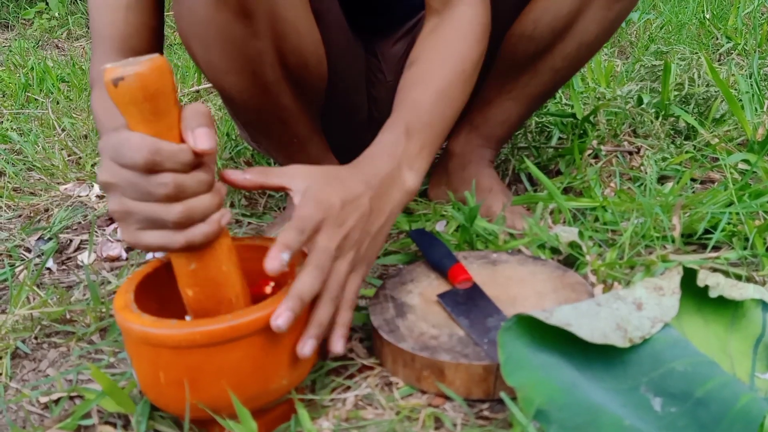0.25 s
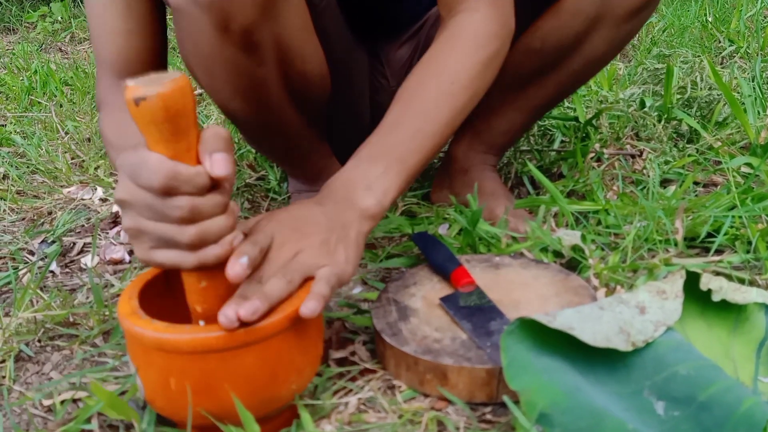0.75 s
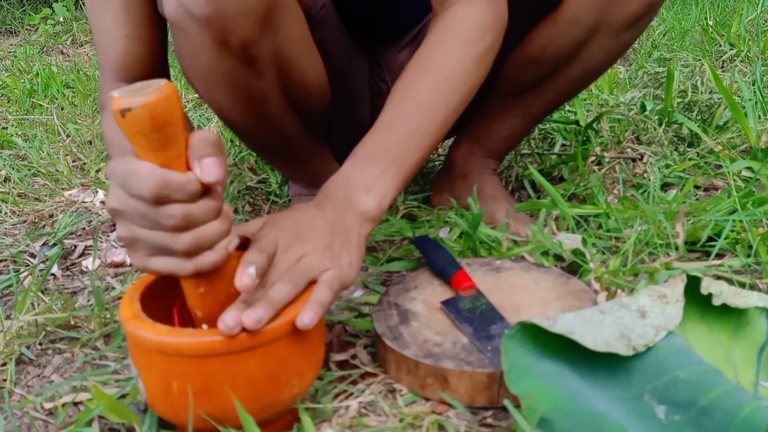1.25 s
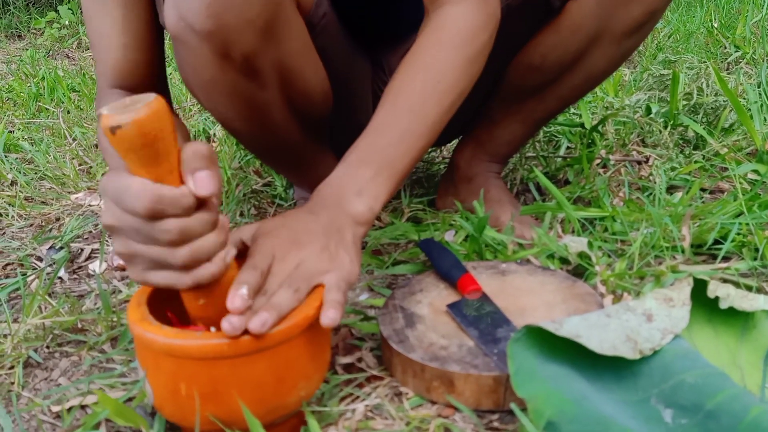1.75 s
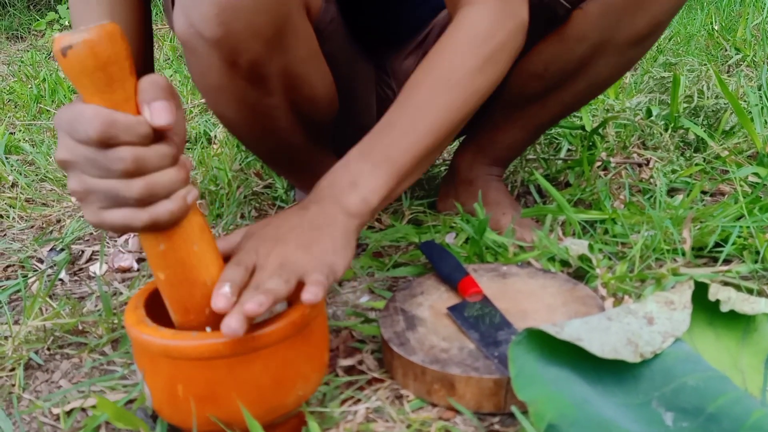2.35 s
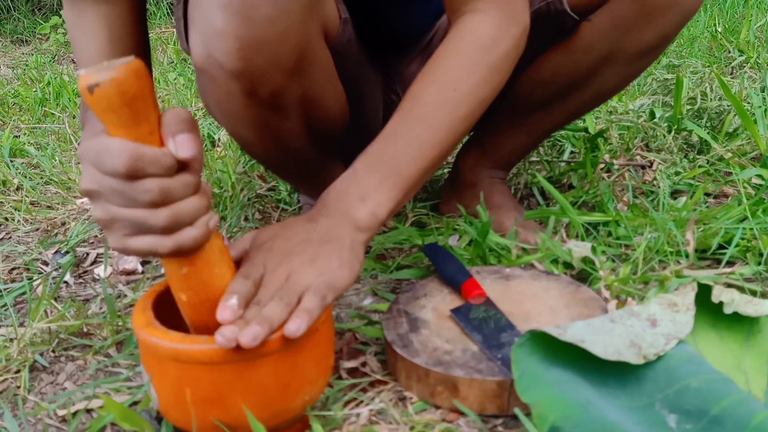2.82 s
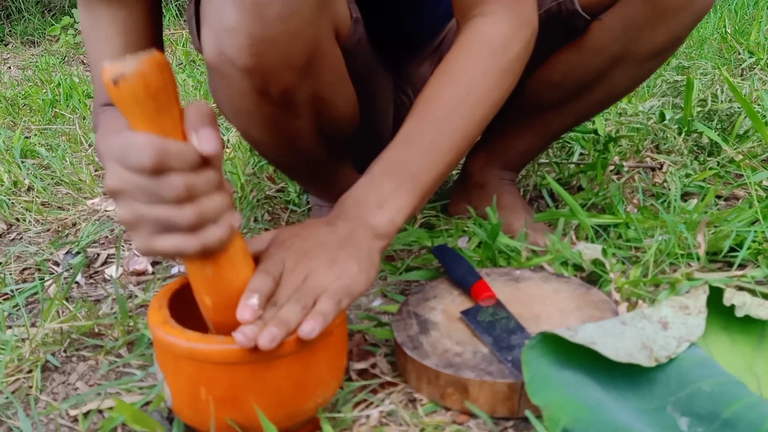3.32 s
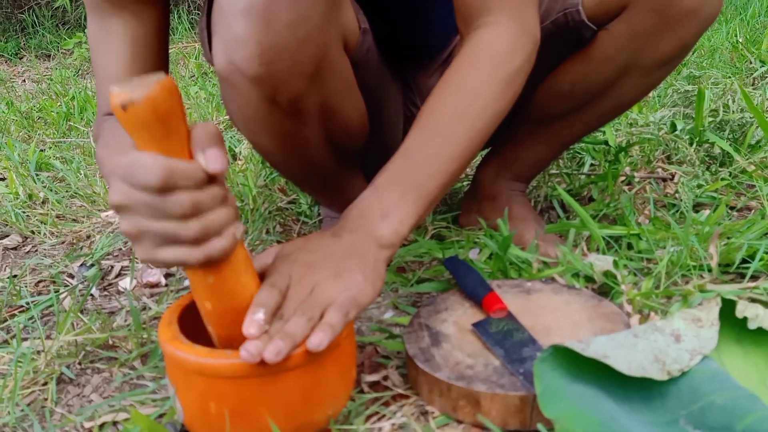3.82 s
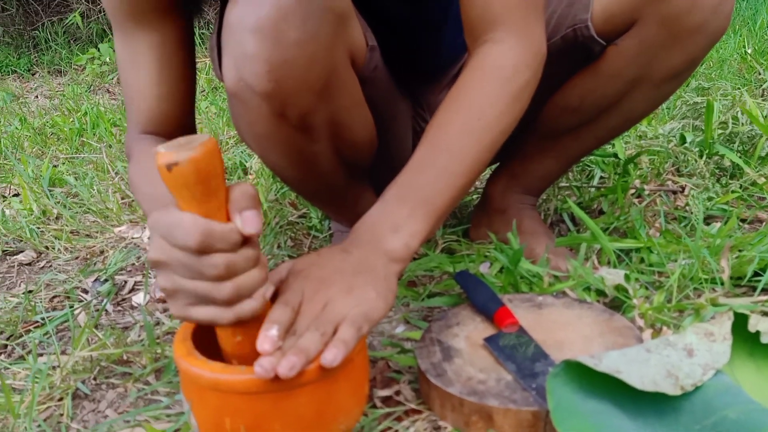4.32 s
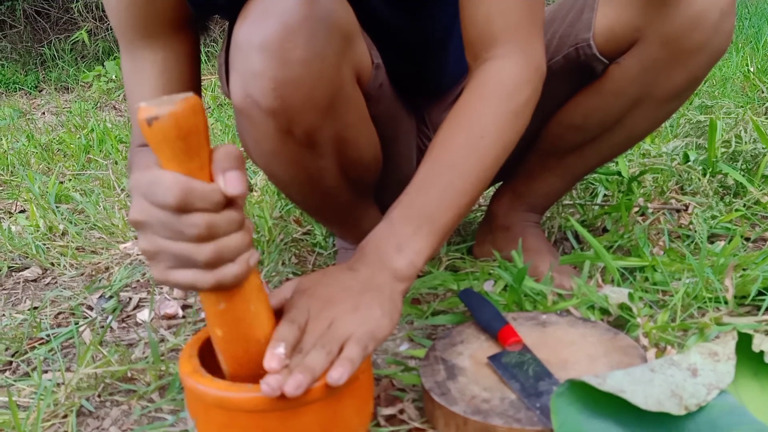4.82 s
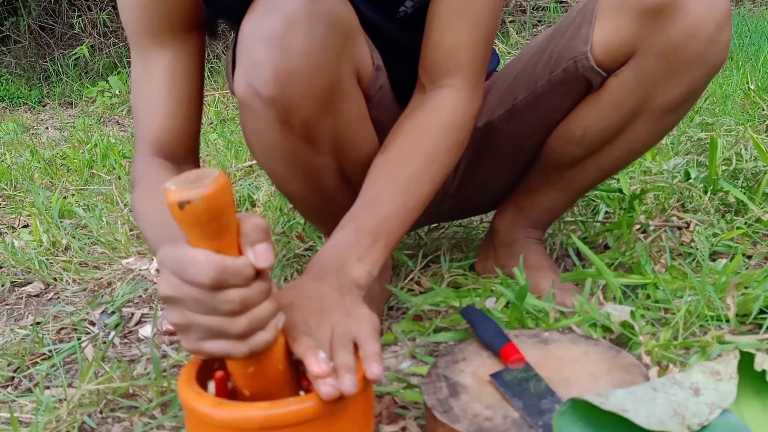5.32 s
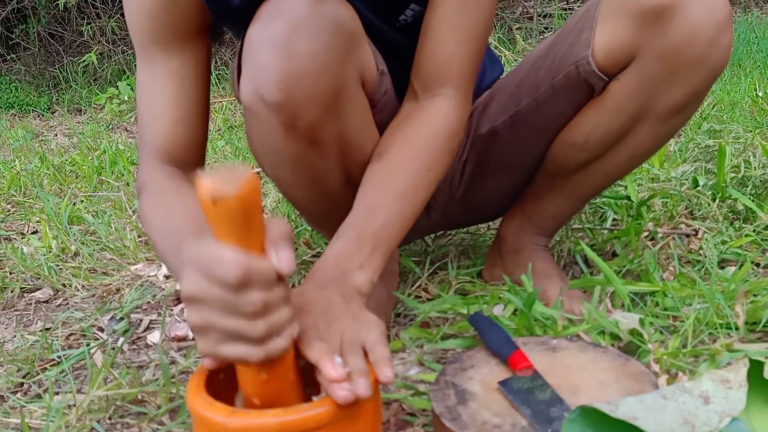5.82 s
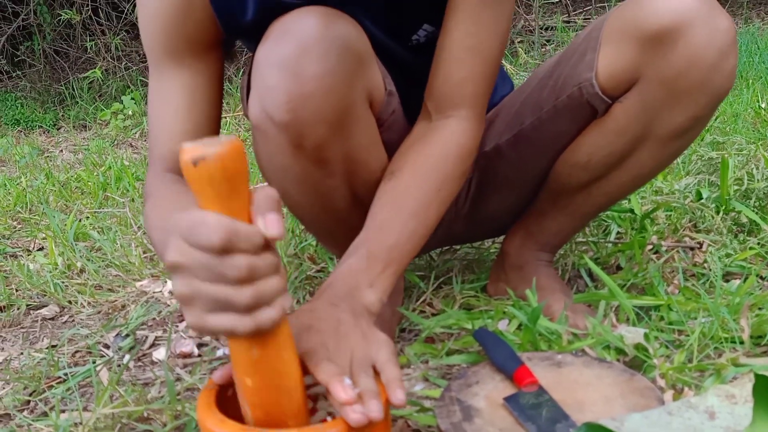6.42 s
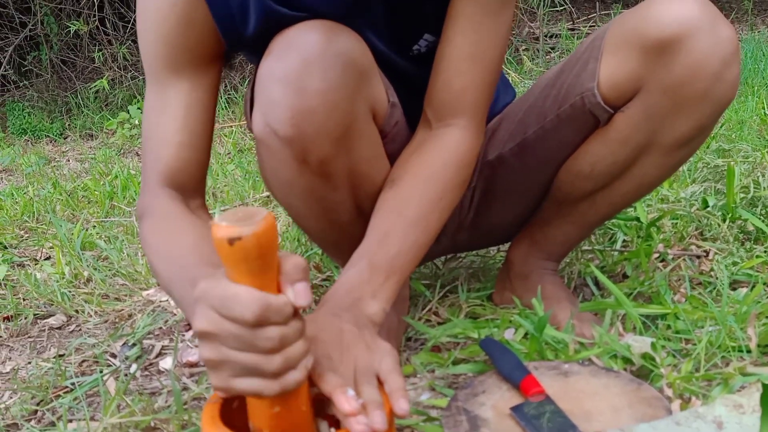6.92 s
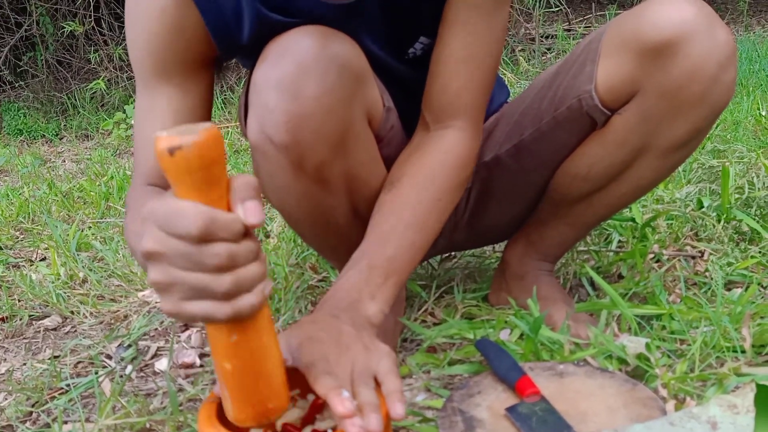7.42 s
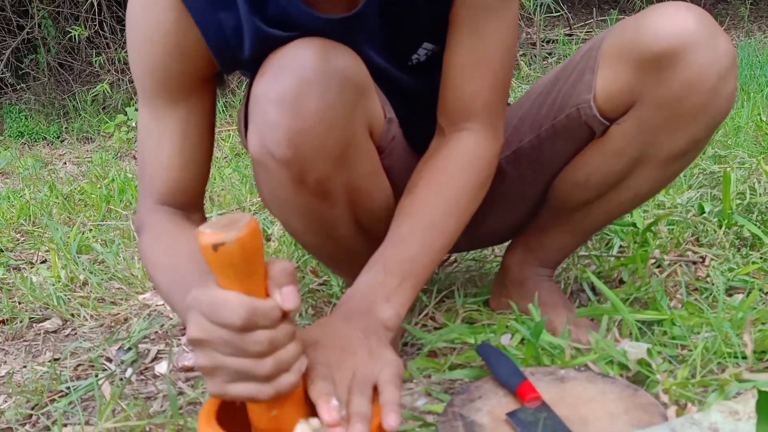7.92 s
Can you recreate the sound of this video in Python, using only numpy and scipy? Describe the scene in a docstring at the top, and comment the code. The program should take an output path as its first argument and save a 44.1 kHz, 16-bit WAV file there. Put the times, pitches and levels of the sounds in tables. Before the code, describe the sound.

A wooden pestle pounds chillies in a clay mortar on grass, heard close in stereo. A faint crunch at 0.2 s is followed by a firmer one at 0.7, then blows from 1.15 s quicken to four or five a second. Each is a brief gritty crunch with a dry, quickly damped hollow clay ring; crisp pod snaps spit out, clearest around 1.7 to 2.6 s. A very hard double-edged clack hits at 1.9 s, lighter knocks at 2.7 and 3.1, and another hard clack at 3.3. The microphone ducks after the hard hits and recovers. From 3.6 s the blows become even, about three a second, with soft ground thuds stronger near 7 s. Quiet outdoor wash continues throughout, with low wind flutter and small buffets, mostly left, strongest near 8 s. Two very faint far whistles, possibly a bird, come at 7.5 and 8 s.

```python
"""Chillies pounded in a clay mortar

A wooden pestle pounds chillies in a clay mortar on grass, close to a two-port microphone.
Blows crunch as bursts of noise, pods snap as tiny noisy spits, and dying sines ring clay and bowl air.
Far outdoor wash and wind are shaped noise; two faint far whistles are sines.
Gain control turns everything down after hard knocks, then lets the level recover."""
import sys
import numpy as np
from scipy import signal
from scipy.fft import rfft, irfft, next_fast_len
from scipy.io import wavfile
from scipy.ndimage import uniform_filter1d

SR = 44100
rng = np.random.default_rng(int(sys.argv[2]) if len(sys.argv) > 2 else 0)


def persist_wave(psi):
    """Save psi, clipped to +-1, as 16-bit WAV."""
    counts = np.round(np.clip(psi, -1, 1) * 32767).astype(np.int16)
    wavfile.write(sys.argv[1], SR, np.atleast_2d(counts).T)


N = 359415  # length in samples

# Pods crushed by each blow: peak_s, crunch_db, crispness_db, bowl_air_db, bowl_air_hz,
# wall_ring_db, favoured_wall_hz, ground_thud_db, fall_s
CRUSHING_BLOWS = [(0.1724, -42, -2, -57, 920, -58, 1720, -66, 0.014),
                  (0.727, -33, -5, -37.5, 840, -45, 1720, -54, 0.0039),
                  (1.154, -36, -2.5, -37, 870, -47, 1135, -45, 0.012),
                  (1.4609, -32, 1, -39, 837, -40, 1720, -59, 0.0044),
                  (1.6911, -36.5, 8.5, -41.5, 750, -49, 2500, -60, 0.0046),
                  (1.9047, -35.5, 2.5, -59, 640, -37, 2460, -30, 0.012),
                  (2.1148, -34.5, 3.5, -47, 670, -57, 1670, -62, 0.0057),
                  (2.4107, -36, 1, -52, 900, -35, 1860, -58, 0.012),
                  (2.628, -38.5, 2, -46.5, 610, -40, 1670, -53, 0.012),
                  (2.8526, -34.5, -1, -49, 716, -42, 1670, -69, 0.0041),
                  (3.0805, -33.5, 8, -40, 802, -38, 1760, -40, 0.0056),
                  (3.6387, -38.5, -20, -41, 730, -52, 1680, -61, 0.0045),
                  (3.919, -35, -14, -38.5, 716, -56, 1680, -58, 0.0048),
                  (4.2246, -41, -6, -46.5, 755, -43, 1780, -58, 0.0092),
                  (4.5383, -39, 3, -43.5, 697, -36, 1144, -38.5, 0.0029),
                  (4.8542, -36, -16, -49, 740, -38, 1560, -48, 0.0056),
                  (5.1687, -46.5, 9, -47.5, 673, -39.5, 1670, -52, 0.014),
                  (5.4696, -32.5, -10, -43, 610, -50, 1680, -44, 0.003),
                  (5.7722, -35.5, 3.5, -48, 754, -48, 1610, -44, 0.0061),
                  (6.0896, -37.5, 2, -54, 633, -42, 1680, -47, 0.0045),
                  (6.4218, -35.5, 4.5, -44, 695, -45, 1630, -38, 0.0067),
                  (6.7501, -30.5, 4.5, -39.5, 720, -43, 1670, -34.5, 0.0021),
                  (7.0903, -35, 3, -37.5, 642, -40.5, 1640, -25, 0.004),
                  (7.4489, -32.5, 3.5, -43.5, 736, -45, 1700, -36, 0.011),
                  (7.7995, -34, 3, -50.5, 750, -32.5, 1560, -57, 0.0091),
                  (8.109, -34.5, 2, -40, 720, -46, 1760, -30, 0.0064)]
# Wood hitting clay: start_s, push_db, bowl_air_hz, wall_ring_db, favoured_wall_hz, favoured_wall_db,
# crack_db, contact_s, second_contact_after_s, second_push_db
CLAY_KNOCKS = [(1.9117, -4.5, 752, -15, 1700, 5.5, -37, 0.00013, 0.0019, 3),
               (2.6606, -16, 728, -48, 1630, 8, -51, 0.00035, 0.00192, -11),
               (3.1105, -17.5, 730, -49, 1600, 4, -61, 0.00038, 0.002, -15.5),
               (3.3343, -8.5, 724, -6, 1562, -24, -27.5, 0.00015, .0052, 5.5),
               (4.492, -33.5, 607, -56, 1160, 3, -61, 0.00063, 0.00226, -42),
               (4.5215, -32, 610, -53, 1160, 1, -60, 0.00065, 0.0024, -27.5)]
# Single pods snapping: start_s, peak_db, pitch_hz, left_minus_right_db, length_s
POD_SNAPS = [(0.172, -29, 5750, -7, 0.0011), (0.1987, -29, 4800, 11, 0.0018),
             (1.6933, -19, 5100, 2, 0.0028), (2.1136, -19.5, 5640, -3.0, 0.0078),
             (2.4095, -14.5, 4000, 0.5, 0.0031), (2.412, -28, 4900, -19, 0.002),
             (2.625, -23.5, 4040, 3, 0.0037), (3.0845, -27, 6100, -13, 0.0014),
             (3.921, -24, 4940, 1, 0.0014), (6.089, -32, 4170, 6, 0.003),
             (7.4474, -28.5, 3580, -17, 0.0018), (7.45, -31.5, 2160, -15, 0.0052),
             (7.4584, -30, 1630, 17, 0.00085)]
# The pestle grazing the wall: start_s, level_db, favoured_wall_hz
WALL_GRAZES = [(1.1925, -45, 1160), (1.7725, -48, 1170), (1.799, -49, 1170), (5.0172, -44, 2420),
               (6.4988, -50, 1160)]
# Ringing tones of the clay wall: pitch_hz, level_db, time_to_fall_60_db_s
WALL_MODES = [(1180, -7, 0.056), (1622, 3.5, 0.056), (1871, -10.5, 0.034), (2233, -8.5, 0.032),
              (2702, -17, 0.017), (3180, -7.5, 0.019), (3640, -29.5, .012), (4600, -28, .012),
              (5600, -26.5, 0.036)]
# The bowl rocking on the ground: pitch_hz, level_db, time_to_fall_60_db_s
ROCKING_MODE = (676, -2.6, 0.0079)
# Tone colour of crushed pods: frequency_hz, level_db (per Hz)
CRUSH_COLOUR = [(880, -5.5), (1500, -6), (1690, 5.5), (1920, -5.5), (3000, -3.5), (3380, -6.5),
                (3810, -0.5), (4200, -9), (5830, 2.5), (8080, -19.5), (11900, -22), (13800, -18.5),
                (16000, -30.5)]
# How far the left port leads for the mortar: frequency_hz, left_lead_radians
PORT_LEAD = [(100, 0), (450, -.5), (800, -.35), (1163, -.8), (1560, -2.6), (1800, -3.4), (2400, -6.5),
             (3800, -9.8), (5800, -16.8), (16000, -43)]
# How alike the crunch is at both ports: frequency_hz, likeness (0 to 1)
CRUNCH_LIKENESS = [(500, 0.65), (1500, 0.27), (4000, 0.54), (10000, 0.077)]
# Level difference of the mortar between the ports: frequency_hz, left_minus_right_db
PORT_SHADE = [(800, 0), (1160, 2), (1560, -2), (1950, -4), (2500, -2), (6000, -2), (14000, 3)]
# Faint far whistles, perhaps a bird: start_s, length_s, pitch_hz, level_db
FAR_WHISTLES = [(7.517, 0.038, 1280, -61), (7.984, 0.082, 1230, -61)]
# Tone colour of the outdoor wash: frequency_hz, level_db (per Hz)
WASH_COLOUR = [(24, -53), (40, -4.5), (124, -0.5), (329, -9), (422, -17), (615, -13), (1370, -20),
               (2150, -14.5), (3470, -22.5), (4300, -22.5), (5720, -14), (6820, -24.5), (9940, -32),
               (13800, -30), (14800, -31), (16000, -64)]
# How alike the wash is at both ports: frequency_hz, likeness (-1 to 1)
WASH_LIKENESS = [(60, 0.86), (130, 1), (290, 0.41), (640, 0.52), (1410, -0.2), (3100, 0.1), (6820, -0.047),
                 (15000, 0.061)]
# Level difference of the wash between the ports: frequency_hz, left_minus_right_db
WASH_LEAN = [(60, -0.5), (180, 0.5), (550, 0.5), (1650, 1.0), (4970, -1), (15000, 3.5)]
# Rising and falling breeze on the ports: time_s, level_db
BREEZE = [(0, -70), (1.101, -67.5), (2.2, -57), (3.3, -55), (4.05, -53.5), (4.45, -66), (4.8, -55),
          (5.3, -52), (5.65, -62), (6.3, -53.5), (7.0, -68.5), (7.649, -59), (8.15, -52)]
# Wind buffets: middle_s, level_db, half_length_s, left_minus_right_db
WIND_BUFFETS = [(1.474, -43, 0.018, 5), (4.2, -50.5, 0.046, 22.5), (4.9, -45, 0.017, 2),
                (5.23, -49, .05, -1), (5.76, -46.5, 0.026, 18), (6.143, -53.5, 0.026, 12),
                (6.346, -55, 0.036, 17), (7.777, -51, 0.017, 22), (7.83, -51.5, .03, 11),
                (7.905, -41, 0.03, 22), (8.078, -42, 0.057, 5)]
# Tone colour of the wind: frequency_hz, level_db (per Hz)
WIND_COLOUR = [(15, -57), (25, -21), (65, 12), (130, 8.5), (271, -8), (354, -14.5), (420, -31), (530, -25),
               (700, -33.5), (910, -73), (1540, -120)]

SCATTER_DB = 5.5  # each crunch falls a little left or right
# Rise of the crunch: harder blows and long-settling ones rise quicker
SINK_S, HARD_DB, QUICKER_PER_DB, USUAL_FALL_S, TRADE = 0.0062, -35.5, 0.09, 0.0042, 0.39
AIR_LEAD_S = 0.0032  # the bowl air is squeezed just before the crunch peaks
AIR_T60_S = 0.04  # time for the bowl air to fall 60 dB after a knock
WASH_DB = -51
# The left port is more exposed to wind; each port flutters by itself
WIND_LEAN_DB, FLUTTER_DB, FLUTTER_S = 5.5, 4.0, 0.06
EDGE_HZ = 15900  # top of the microphone's band


def gain_of(db):
    """Turns dB into a multiplier."""
    return 10 ** (np.asarray(db) / 20)


def evened(x):
    """Scales a sound to an average strength (rms) of 1."""
    return x / np.sqrt(np.mean(x ** 2) + 1e-20)


def levelled(x, db):
    """Sets the crest of a ringing sound so that its loudest cycles have rms db."""
    return gain_of(db) * np.sqrt(2) * x / abs(x).max()


def read(points, hz):
    """Reads a table between its points, on a log-frequency axis."""
    f, value = np.transpose(points)
    return np.interp(np.log(hz + 1), np.log(f + 1), value)


def add(mix, s, sound):
    """Mixes a sound in at s seconds."""
    part = mix[:, round(s * SR):][:, :sound.shape[-1]]
    part += sound[..., :part.shape[1]]


def panned(x, lr_db):
    """Splits a left-minus-right level difference between the ports."""
    return x * gain_of([[lr_db / 2], [-lr_db / 2]])


def shaped(x, gains):
    """Colours a sound by multiplying its spectrum by gains(Hz)."""
    size = next_fast_len(N)
    spectrum = rfft(x, size) * gains(np.fft.rfftfreq(size, 1 / SR))
    return irfft(spectrum, size)[..., :N]


def ring(modes, rise):
    """Adds dying sines, one per ringing tone, that build up over rise seconds."""
    t = np.arange(3000) / SR
    sines = sum(gain_of(db - 60 * t / t60) * np.sin(2 * np.pi * hz * t) for hz, db, t60 in modes)
    return sines * (1 - np.exp(-t / rise))


def mortar():
    """Passes all mortar sounds to the ports with their lag and shade; crunches differ between ports."""
    # crunch lanes: two for what the ports share, two for what differs
    crunch, bowl = np.zeros((4, N)), np.zeros((2, N))
    for row in CRUSHING_BLOWS:
        blow(crunch, bowl, *row)
    for row in CLAY_KNOCKS:
        knock(crunch, bowl, *row)
    for s, *row in WALL_GRAZES:
        add(bowl, s, graze(*row))
    for s, *row in POD_SNAPS:
        add(bowl, s, snap(*row))

    def alike(hz):
        return np.clip(read(CRUNCH_LIKENESS, hz), 0, 1)

    def colour(hz):
        db = read(CRUSH_COLOUR, hz)
        return gain_of(db) / np.sqrt(np.mean(gain_of(2 * db)))

    hiss = shaped(crunch[:2], lambda hz: colour(hz) * np.sqrt(alike(hz)))
    hiss += shaped(crunch[2:], lambda hz: colour(hz) * np.sqrt(1 - alike(hz)))
    half = np.array([[.5], [-.5]])  # each port takes half of every difference

    def to_ports(hz):
        return np.exp(1j * half * read(PORT_LEAD, hz)) * gain_of(half * read(PORT_SHADE, hz))

    return shaped(bowl + hiss, to_ports)


def blow(crunch, bowl, s, db, crisp_db, air_db, air_hz, wall_db, wall_hz, thud_db, fall):
    """The pestle sinks through the pods: a swell of tiny fractures hisses and shakes the bowl."""
    t = np.arange(-1200, 2400) / SR  # zero is the peak
    rise = SINK_S * np.exp(-QUICKER_PER_DB * (db - HARD_DB)) * (USUAL_FALL_S / fall) ** TRADE
    lr_db = SCATTER_DB * rng.standard_normal()
    swell = np.exp(-(abs(t) / np.where(t < 0, rise, fall)) ** 0.92)
    # a softer, longer swell: pods give early and settle late
    swell += gain_of(-26.0) * np.exp(-abs(t) / np.where(t < 0, .008, .02))
    clumps = gain_of(5.3 * evened(uniform_filter1d(rng.standard_normal(len(t)), size=30)))
    grit = evened(rng.standard_normal((len(t), 3)).T * clumps) * swell
    fine = signal.sosfilt(signal.butter(4, 7500., "high", fs=SR, output="sos"), grit)
    # dry skins add treble, wet pulp less
    hiss = (grit + (gain_of(crisp_db) - 1) * fine) * gain_of(db)
    add(crunch, s + t[0], np.vstack([panned(hiss[0], lr_db), panned(hiss[1:], lr_db)]))

    air = ring([(air_hz, 0, .034)], 0.0011)  # the pulp damps the air ring
    wall = ring([(wall_hz, 7., .035)] + WALL_MODES, 0.0018)  # the struck spot favours one tone
    ground_modes = [(450, 3.5, 0.033), (347, 7.5, 0.021), (258, 3, 0.039), (161.5, -12.5, 0.26)]
    ground = ring(ground_modes, 0.00041)
    squeeze = grit[0] * swell ** 0.49  # the air is pushed mostly at the deepest moment
    add(bowl, s + t[0] - AIR_LEAD_S, levelled(signal.fftconvolve(squeeze, air), air_db))
    add(bowl, s + t[0], levelled(signal.fftconvolve(grit[0], wall), wall_db))
    add(bowl, s - .0007, levelled(ground, thud_db))


def knock(crunch, bowl, s, db, air_hz, wall_db, wall_hz, favour_db, crack_db, contact, after, second_db):
    """A half-sine push and a second contact ring the bowl air; the resting pestle soon mutes the wall."""
    t = np.arange(600) / SR
    lag = s * SR % 1 / SR  # the part of the start time smaller than one sample

    def push(start, width):
        phase = np.clip((t - start) / width, 0, 1)
        return -np.sin(np.pi * phase) / (width * SR / 2)

    pushes = gain_of(db) * push(lag, contact) + gain_of(second_db) * push(lag + after, contact)
    air = signal.fftconvolve(pushes, ring([(air_hz, 0, AIR_T60_S), ROCKING_MODE], 0.0022))
    wall_push = gain_of(wall_db) * push(lag, 0.19 * contact)
    wall = signal.fftconvolve(wall_push, ring([(wall_hz, favour_db, .04)] + WALL_MODES, 0.0011))
    # muting starts after 6 ms at 910 dB a second and stops at 12 dB
    wall *= gain_of(-np.clip(910.0 * (np.arange(len(wall)) / SR - .006), 0, 12.))
    bass_cut = signal.butter(2, 380., "high", fs=SR, output="sos")  # a small bowl radiates little bass
    add(bowl, s, signal.sosfilt(bass_cut, air + wall))
    # grit under the wood
    crack = rng.standard_normal((len(t), 4)).T * np.exp(-t / 0.0051) * np.minimum(t / 0.00051, 1)
    treble_cut = signal.butter(4, 6500., fs=SR, output="sos")
    add(crunch, s, gain_of(crack_db) * signal.sosfilt(treble_cut, crack))


def graze(db, wall_hz):
    """A brief scuff of grit rings the wall faintly."""
    scuff = rng.standard_normal(400) * np.exp(-np.arange(400) / SR / 0.0022)
    wall = ring([(wall_hz, 8., .015)] + WALL_MODES, .0006)
    return levelled(signal.fftconvolve(scuff, wall), db)


def snap(db, hz, lr_db, length):
    """A skin bursts: a quick spit of noise rings around a main pitch and a weaker lower one."""
    t = np.arange(500) / SR
    spit = rng.standard_normal(len(t)) * t / length * np.exp(1 - 8.3 * t / length)
    sound = signal.fftconvolve(spit, ring([(hz, 0, .004), (0.71 * hz, -5, .003)], 0.000091))
    return panned(gain_of(db) * sound / abs(sound).max(), lr_db)


def wind():
    """Lumpy low eddies, unrelated at the two ports: a fluttering breeze and a few buffets."""
    t, (s, db) = np.arange(N) / SR, np.transpose(BREEZE)
    # about 450 random kicks a second at each port
    eddies = gain_of(2.2 * np.minimum(rng.exponential(1, (2, N)), 4)) * (rng.random((2, N)) < 450 / SR)
    eddies *= rng.choice([-1., 1.], (2, N))
    span = round(FLUTTER_S * SR)
    flutter = uniform_filter1d(rng.standard_normal((2, N)), size=span)
    flutter = evened(uniform_filter1d(flutter, size=span))
    level = panned(gain_of(np.interp(t, s, db) + FLUTTER_DB * flutter), WIND_LEAN_DB)
    for middle, top_db, half_length, lr_db in WIND_BUFFETS:
        level += panned(gain_of(top_db) * np.exp(-((t - middle) / half_length) ** 2), lr_db)
    return level * evened(shaped(eddies, lambda hz: gain_of(read(WIND_COLOUR, hz))))


def wash():
    """Distant outdoor noise: random short-time spectra with faint drifting patches."""
    frames, hz = N // 256 + 5, np.fft.rfftfreq(1024, 1 / SR)
    a, b, c, d, patches = rng.standard_normal((frames, 513, 5)).T
    patches = uniform_filter1d(patches, size=12, axis=0)  # across frequency
    patches = evened(uniform_filter1d(patches, size=14, axis=1))  # across time
    same = np.clip(read(WASH_LIKENESS, hz), -1, 1)[:, None]
    left = a + 1j * b
    right = same * left + np.sqrt(1 - same ** 2) * (c + 1j * d)
    lean_db = np.outer([.5, -.5], read(WASH_LEAN, hz))[:, :, None]
    spectra = np.array([left, right])
    spectra *= gain_of(read(WASH_COLOUR, hz)[:, None] + 1.0 * patches + lean_db)
    noise = signal.istft(spectra, nperseg=1024, noverlap=768)[1][:, :N]
    return gain_of(WASH_DB) * evened(noise)


def whistles():
    """Soft sines that fade in and out, weaker at the right port."""
    out = np.zeros((2, N))
    for s, length, hz, db in FAR_WHISTLES:
        t = np.arange(0, length, 1 / SR)
        tone = gain_of(db) * np.sin(2 * np.pi * hz * t) * signal.windows.tukey(len(t), .4)
        add(out, s, tone * [[1], [.6]])
    return out


def scene():
    """Adds up everything that reaches the ports."""
    return mortar() + wash() + wind() + whistles()


def record(dry):
    """Cuts bass, turns all down after a hard knock (gain control), adds an offset and limits the band."""
    dry = signal.sosfilt(signal.butter(3, 48., "high", fs=SR, output="sos"), dry)
    power = uniform_filter1d((dry ** 2).mean(0), size=100)
    power_db = 10 * np.log10(abs(power) + 1e-12)
    recovery_db = np.arange(N) * 44.0 / SR  # 44 dB a second
    over_db = np.maximum(power_db + 9.5, 0)  # how far the power passes -9.5 dB
    # hold the deepest cut so far, easing off at the recovery speed
    duck_db = np.maximum.accumulate(0.71 * over_db + recovery_db) - recovery_db
    ducked = dry / gain_of(uniform_filter1d(duck_db, size=200)) + 0.00081
    band_limit = signal.firwin(511, EDGE_HZ, window=("kaiser", 9), fs=SR)
    return signal.oaconvolve(ducked, band_limit[None], "same")


dry = scene()
out = record(dry)
persist_wave(out)
```